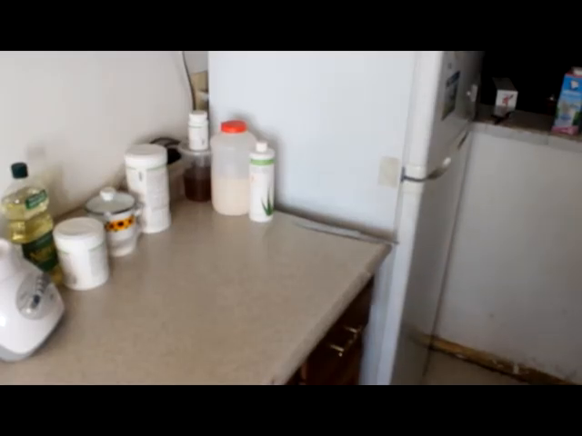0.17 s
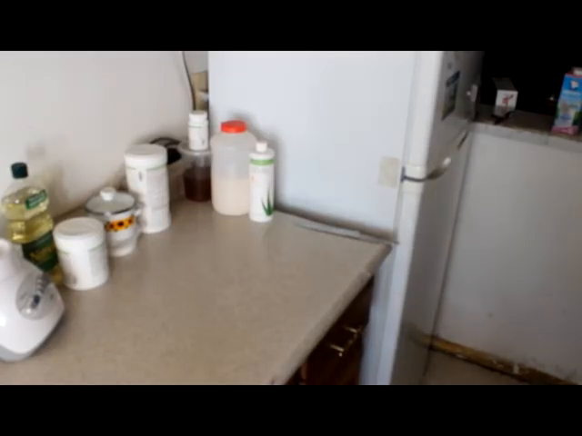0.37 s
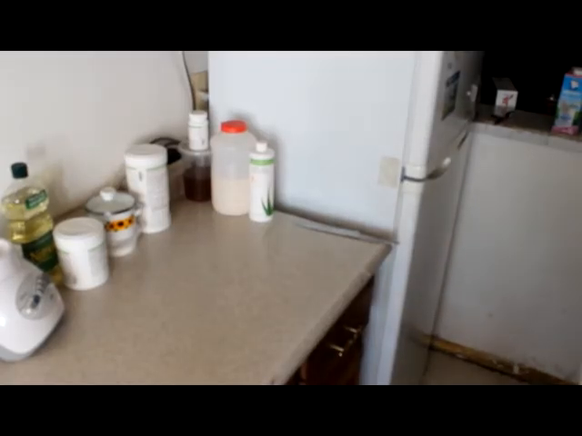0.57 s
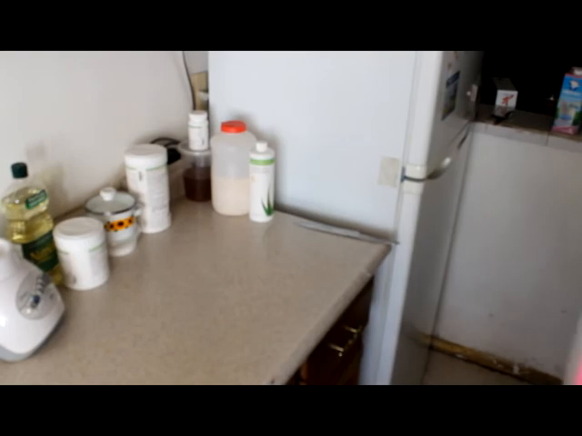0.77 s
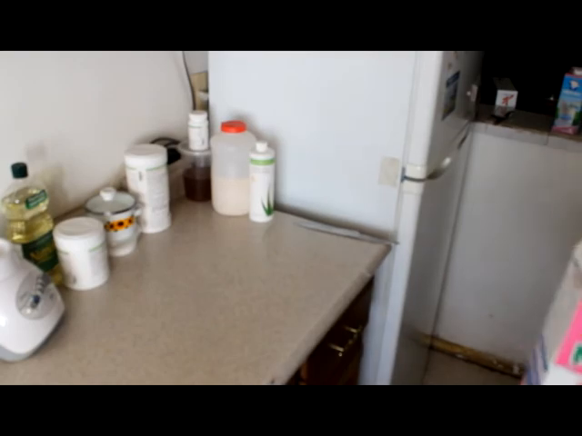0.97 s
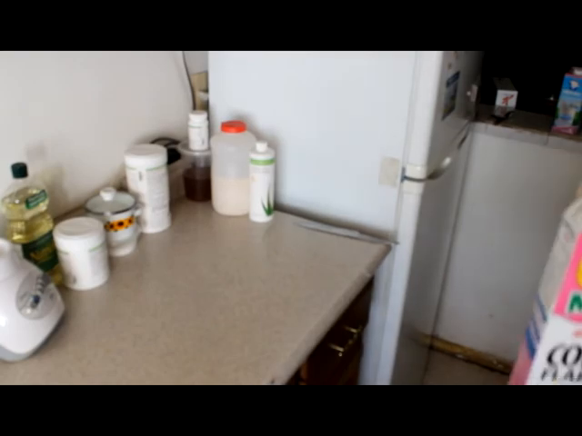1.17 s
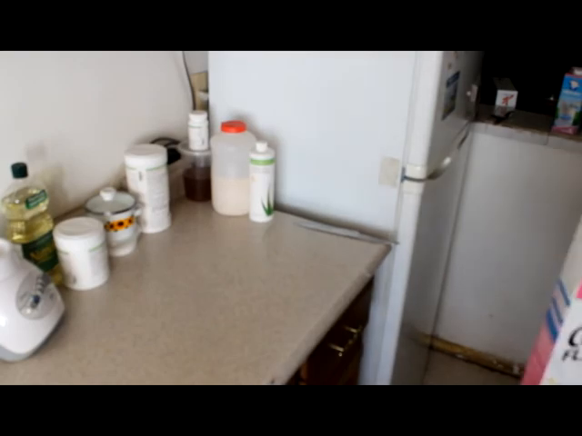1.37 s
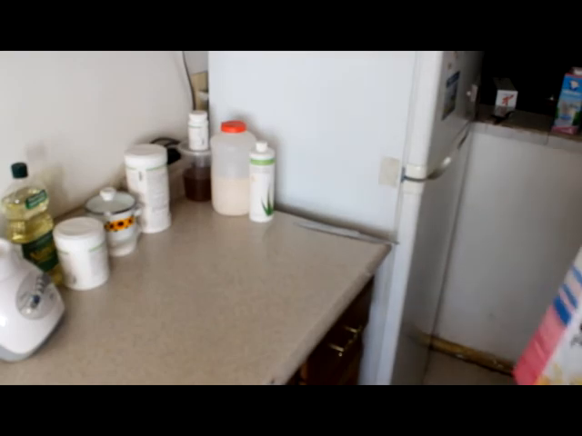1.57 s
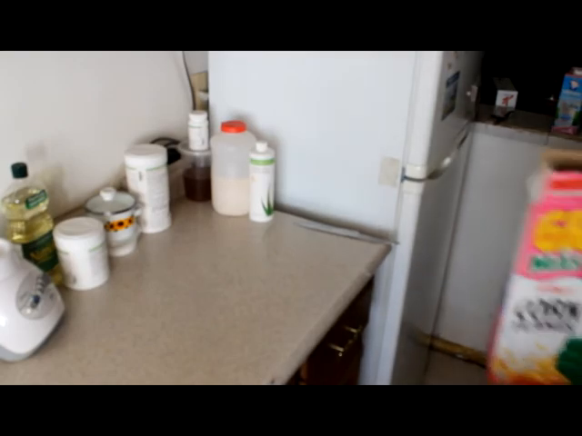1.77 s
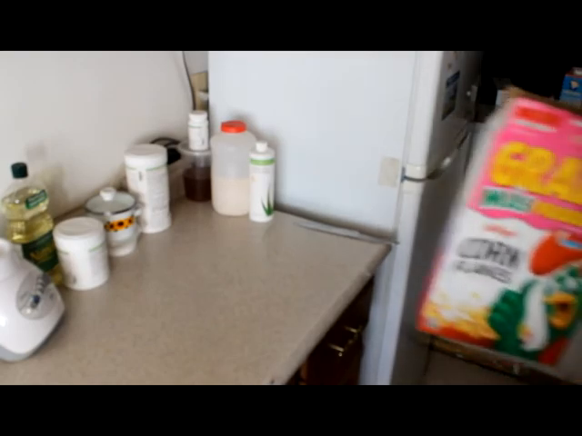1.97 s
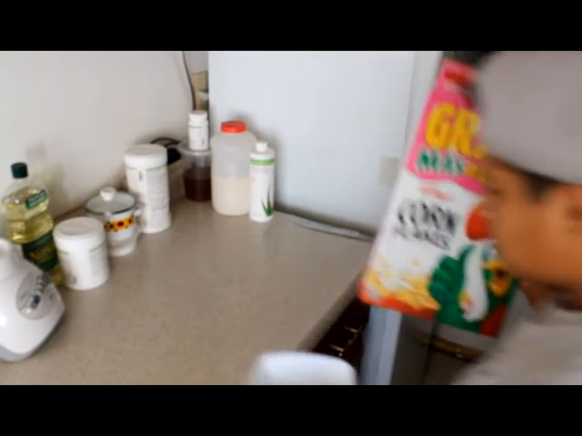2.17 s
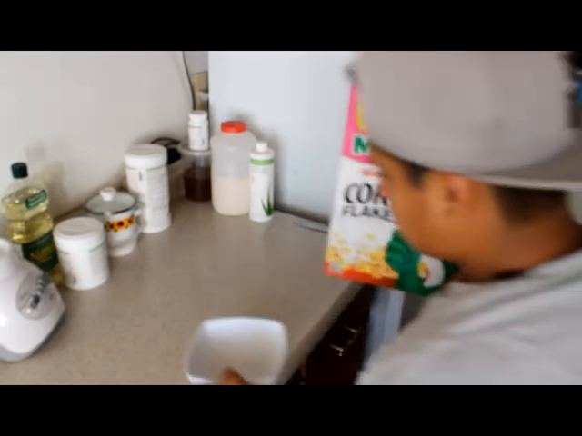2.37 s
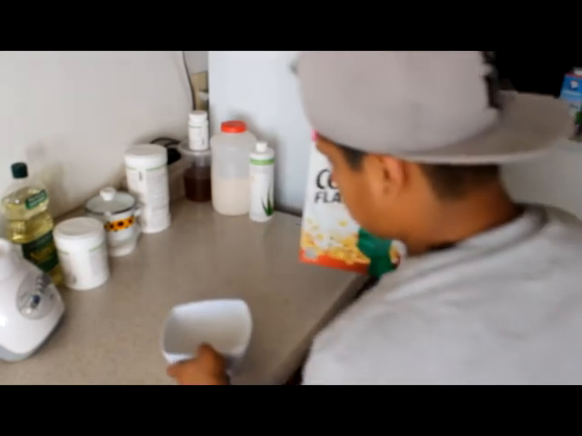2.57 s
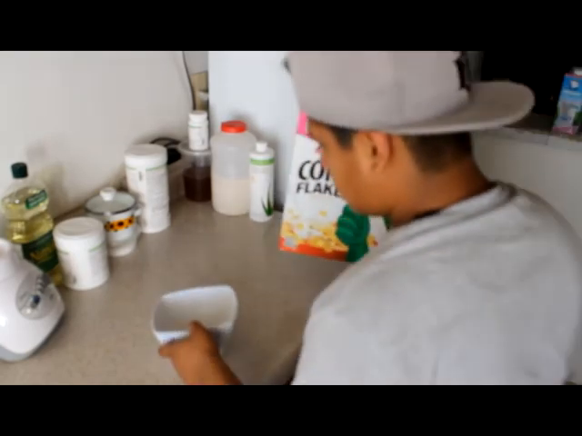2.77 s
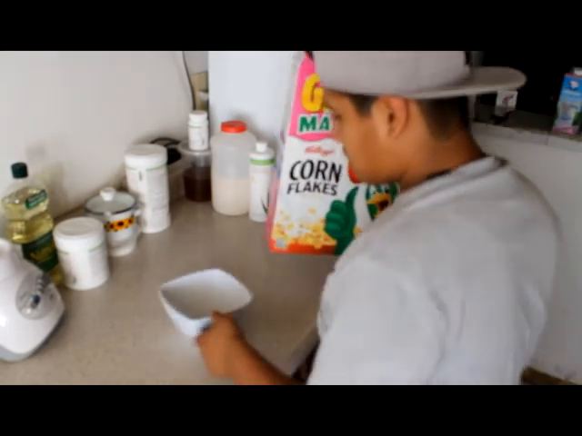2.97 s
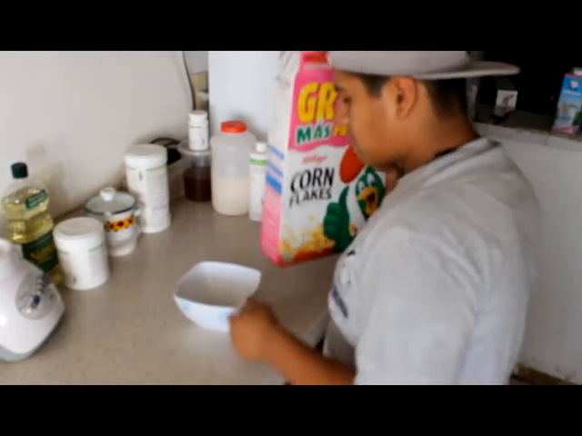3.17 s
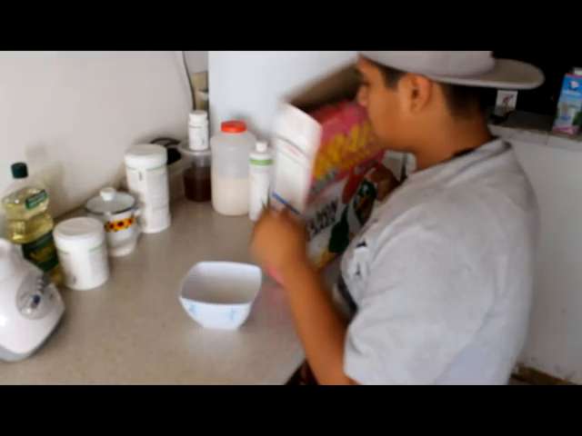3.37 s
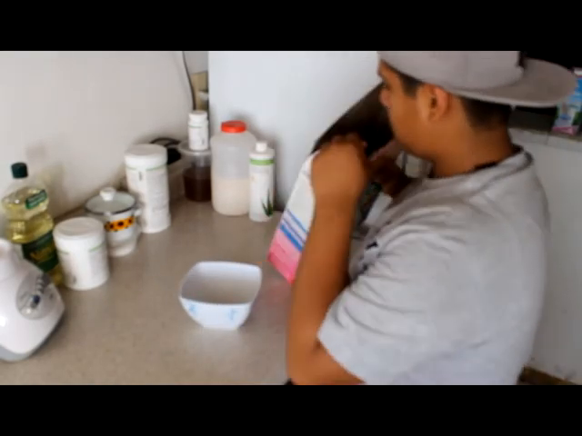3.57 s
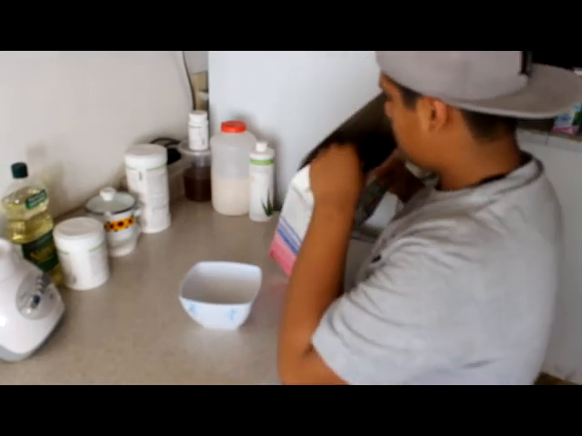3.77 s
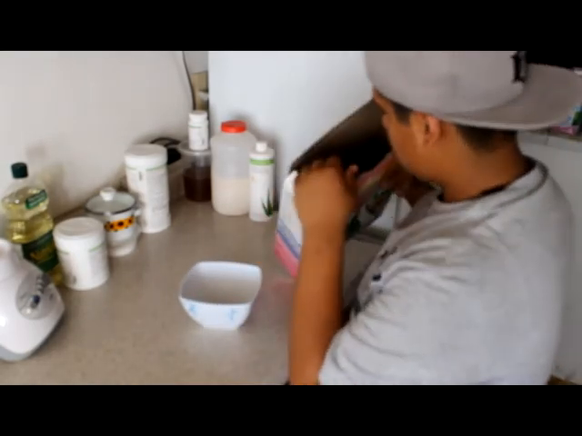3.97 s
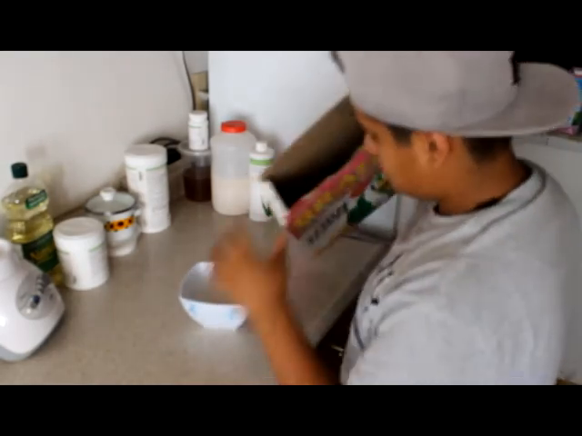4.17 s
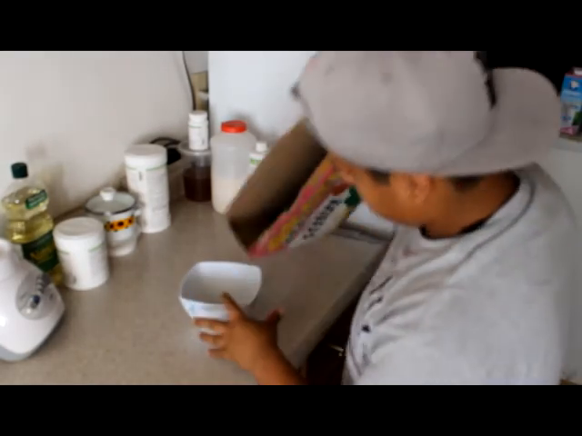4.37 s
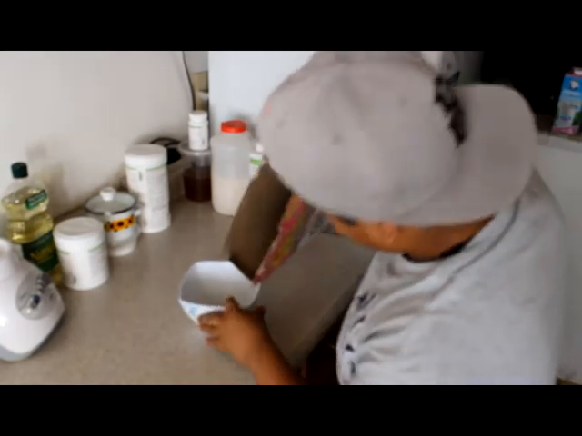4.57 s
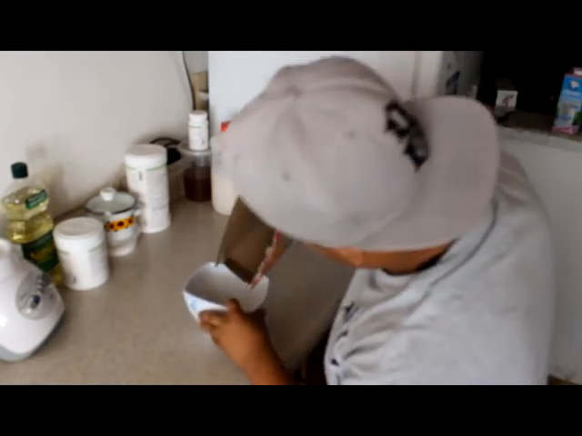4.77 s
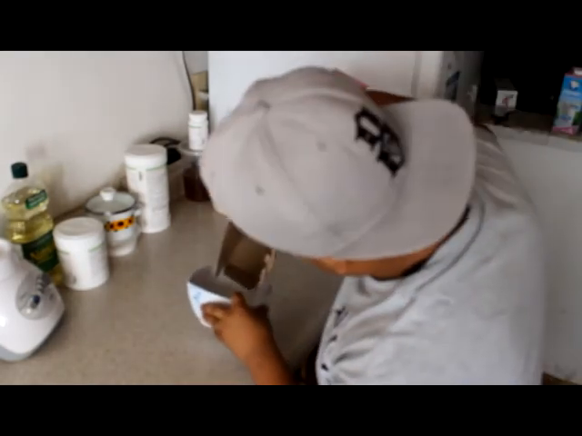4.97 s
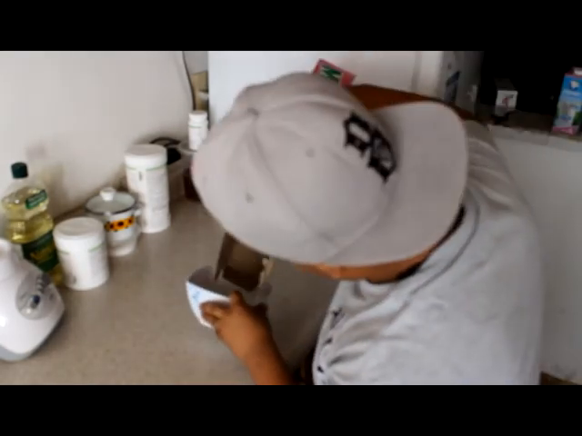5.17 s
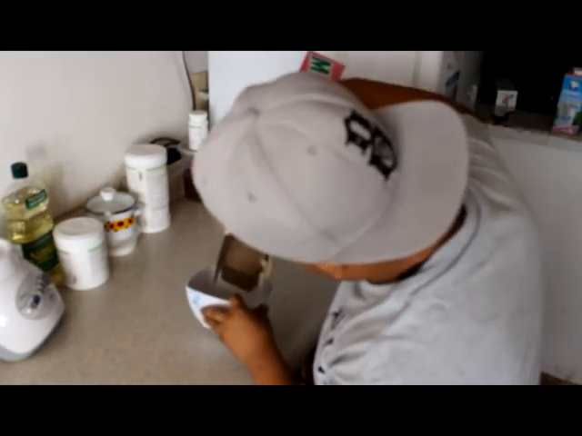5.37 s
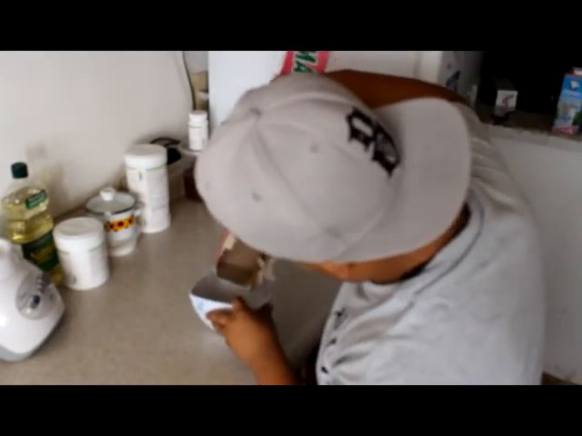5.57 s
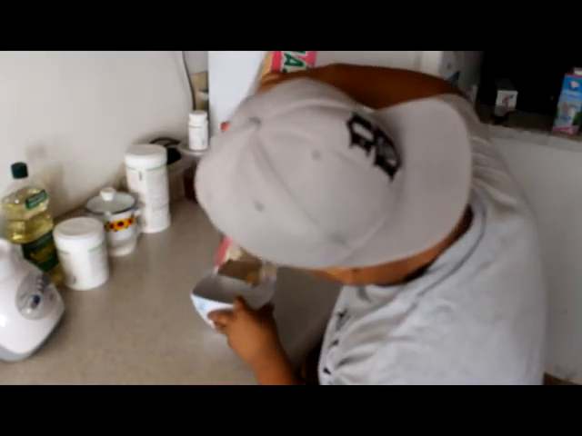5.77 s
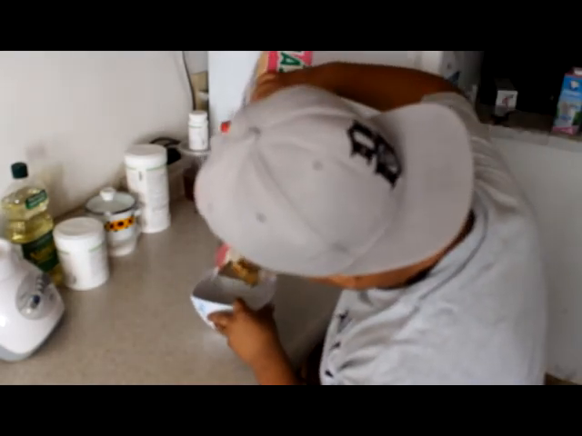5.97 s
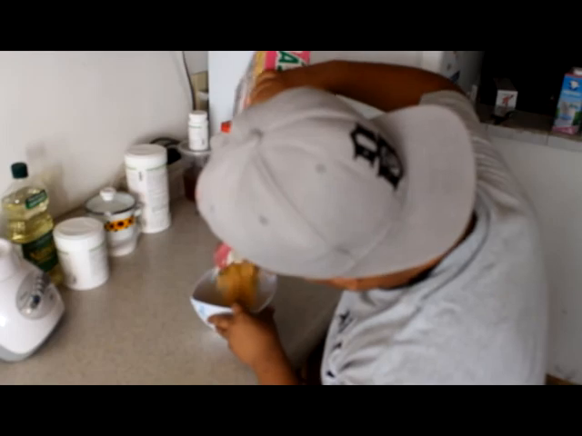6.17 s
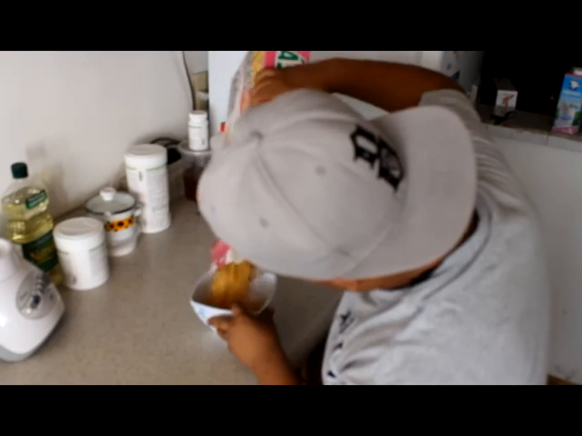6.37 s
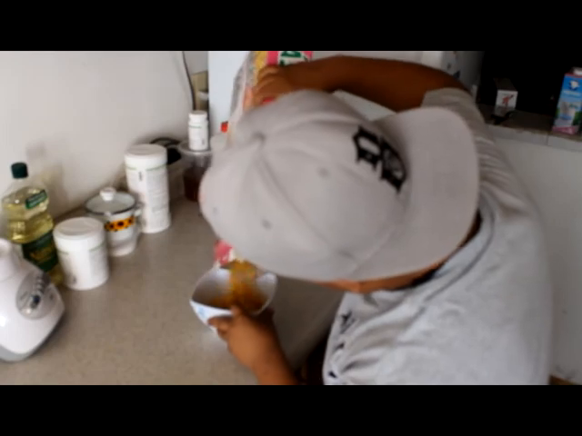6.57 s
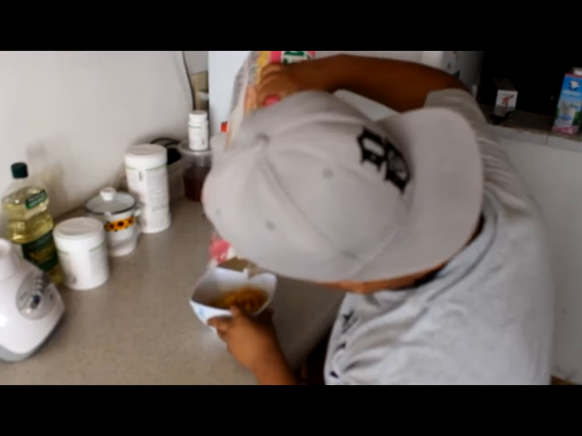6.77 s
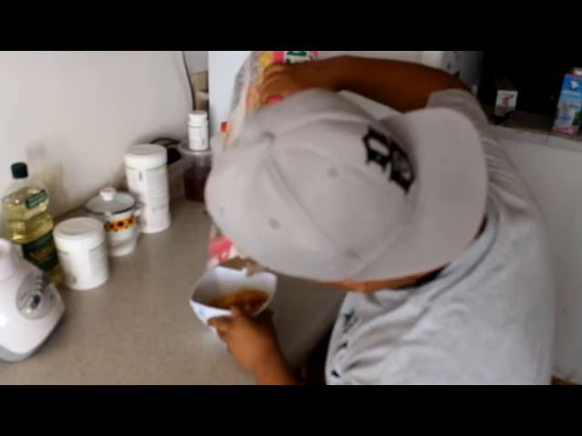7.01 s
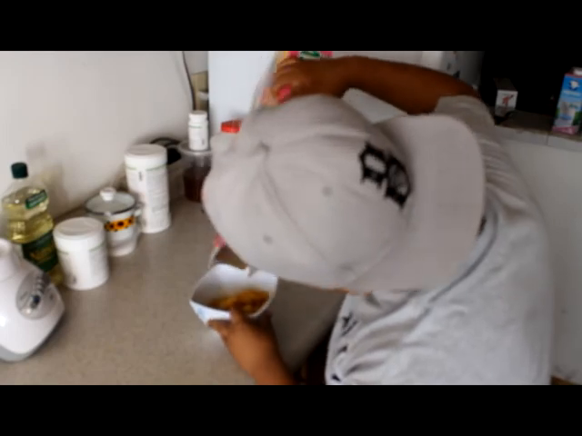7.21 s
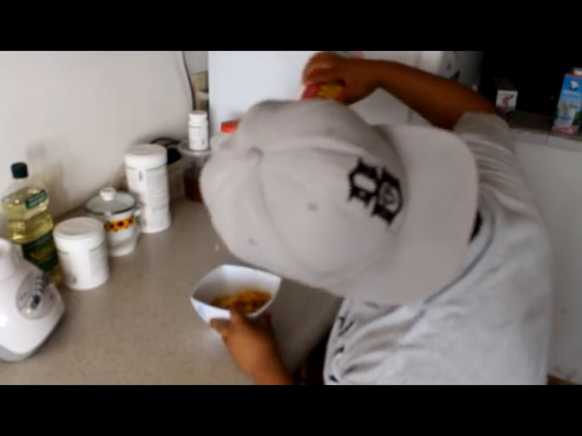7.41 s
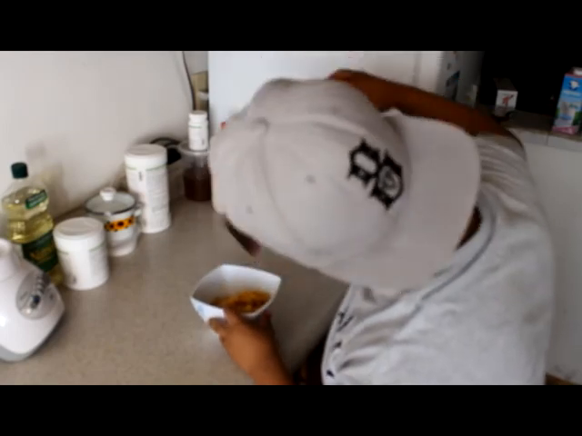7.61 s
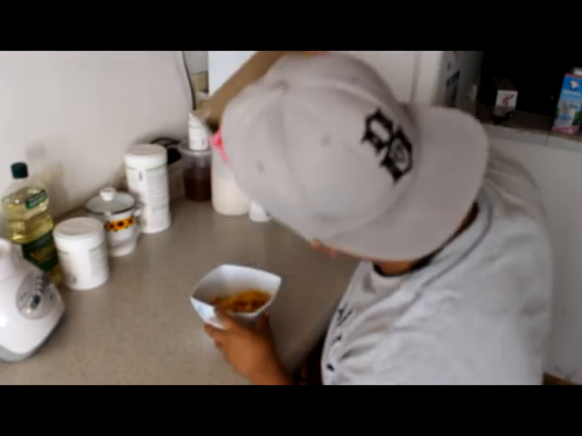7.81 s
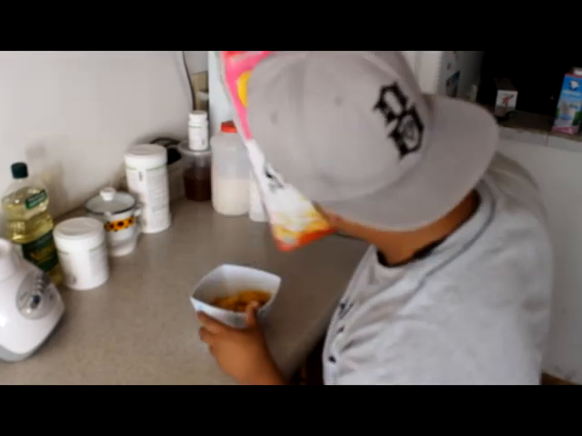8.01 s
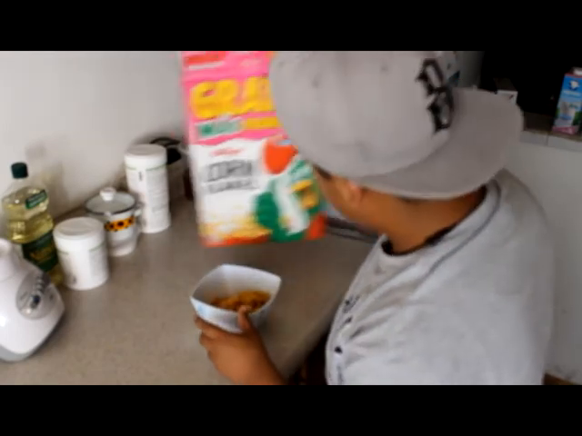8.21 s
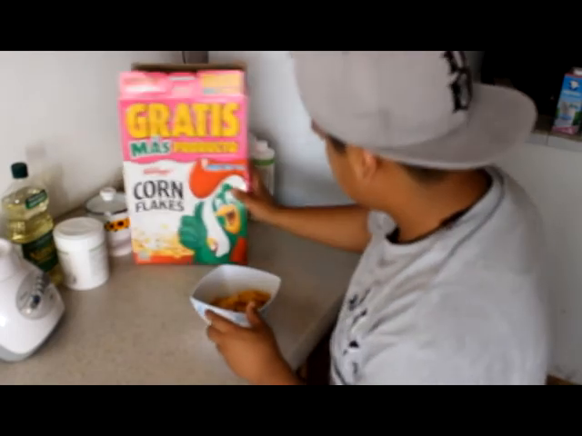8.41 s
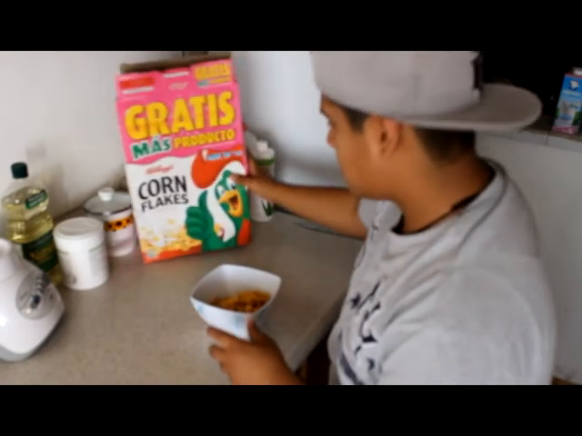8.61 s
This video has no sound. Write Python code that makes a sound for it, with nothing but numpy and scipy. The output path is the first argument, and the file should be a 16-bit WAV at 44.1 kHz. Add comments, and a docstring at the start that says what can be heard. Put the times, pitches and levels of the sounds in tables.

```python
"""Crisp flakes slide and shake in a cardboard box while a bowl is picked up, then set down bouncing.
The box tips, the heap runs to the spout and the flakes pour into the bowl; the box is knocked to the end.
Each flake is a tiny click that rings the carton or the ceramic; each knock is a judder ringing its object
and the counter. A small hard-walled room smears it all over a faint, wavering hum."""
import sys
import numpy as np
from scipy import signal
from scipy.fft import rfft, irfft, next_fast_len
from scipy.io import wavfile
from scipy.ndimage import uniform_filter1d

SR = 44100
rng = np.random.default_rng(int(sys.argv[2]) if len(sys.argv) > 2 else 0)


def persist_wave(psi):
    """Save psi, clipped to +-1, as 16-bit WAV."""
    counts = np.round(np.clip(psi, -1, 1) * 32767).astype(np.int16)
    wavfile.write(sys.argv[1], SR, np.atleast_2d(counts).T)


N = 381465


def undb(db):
    """Decibels to gain."""
    return 10 ** (np.asarray(db) / 20)


def unit(x):
    """Scale to rms 1."""
    return x / np.sqrt(np.mean(x ** 2))


def add(out, time_s, y):
    """Mix y into out from time_s."""
    i = int(time_s * SR)
    out[i:i + len(y)] += y[:N - i]


def sos_filter(x, sos):
    """Run a filter given as second-order sections."""
    return signal.sosfilt(sos, x)


def curve(rows):
    """Columns of (time [s], level [dB], ..) rows at every sample; -120 dB outside."""
    time_s, *columns = np.transpose(rows)
    return [np.interp(np.arange(N) / SR, time_s, c, -120, -120) for c in columns]


def colour(x, points):
    """Shape a spectrum by (frequency [Hz], gain [dB]) points, straight over log frequency."""
    hz, db = np.transpose(points)
    size = next_fast_len(len(x), True)
    f = np.maximum(np.fft.rfftfreq(size, 1 / SR), 1)
    gain = undb(np.interp(np.log(f), np.log(hz), db))
    return irfft(rfft(x, size) * gain, size)[:len(x)]


def resonate(x, peaks):
    """Sum of band-pass resonances with alternating sign, at rms 1."""
    total = 0
    for k, (hz, width_hz, db) in enumerate(peaks):
        band = signal.lfilter(*signal.iirpeak(hz, hz / width_hz, fs=SR), x)
        total = total + (-1) ** k * undb(db) / np.sqrt(width_hz) * band
    return unit(total)


def clicks(rate_hz, scatter_db):
    """Random flake impacts, most small, a few large, at most four scatter steps above the smallest."""
    hit = rng.random(N) < rate_hz / SR
    size_db = scatter_db * np.minimum(rng.exponential(size=N), 4)
    return unit(hit * rng.choice([-1, 1], N) * undb(size_db))


def walk(rate_hz):
    """Random levels joined by straight slews, spread about 0.65."""
    k = int(SR / rate_hz)
    steps = np.repeat(rng.standard_normal(N // k + 1), k)
    return 0.8 * uniform_filter1d(steps, k)[:N]


def surge(peak_s, db, swell_s, fade_s):
    """Gain, once a millisecond: straight dB slopes (s per 20 dB) up to a blunt peak and down."""
    round_s = .012  # bluntness of the peak
    t = np.arange(N * 1000 // SR + 2) / 1000 - peak_s
    distance_s = np.hypot(t, round_s) - round_s
    return undb(db - 20 * distance_s / np.where(t < 0, swell_s, fade_s))


def together(gains):
    """Unrelated rattles add in power; gain at every sample."""
    total = np.sqrt(sum(g ** 2 for g in gains))
    return np.interp(np.arange(N) / SR * 1000, np.arange(len(total)), total)


def ring(modes, stretch, t, near_hz=1000, fall_db=0):
    """One blow on modes, favouring one pitch; each gets a random sign, level share, slight detuning. Peak 1."""
    hz, db, t60_s = np.transpose(modes)[:, :, None]
    share, detune, sign = rng.standard_normal((len(modes), 3)).T[:, :, None]
    db = db + 1.5 * share - fall_db * np.abs(np.log2(hz / near_hz))  # fall in dB per octave
    swing = np.sign(sign) * np.sin(2 * np.pi * hz * (1 + 0.012 * detune) * t)
    y = (undb(db) * swing * 1000. ** (-t / (t60_s * stretch))).sum(axis=0)
    return y / np.abs(y).max()


# flakes sliding or jolted as the box is carried and turned: (time of peak [s], carton level [dB],
# swell [s per 20 dB], fade [s per 20 dB], crisp treble re carton [dB])
SLIDES = [(0.01, -46, .05, .3, -6), (0.08, -36, .02, .1, -18), (0.255, -18.5, .075, .2, -2),
          (0.4, -30, .2, .13, -4), (0.81, -43, .015, .1, -9), (0.88, -37, .02, .07, -14),
          (1.01, -46, .02, .04, -8), (1.09, -46, .1, .5, -3), (1.4, -46, .15, .2, -6),
          (1.48, -37, .03, .1, -11), (1.7, -35, .16, .3, -12), (1.86, -28, .13, .17, -4.5),
          (2.04, -30, .07, .1, -10), (2.15, -26, .05, .25, -5), (2.255, -20, .04, .15, -4.5),
          (2.3, -18, .08, .05, -11), (2.39, -20.5, .07, .3, -3), (2.51, -16, .2, .06, -12),
          (2.585, -17, .02, .11, -8), (2.7, -19.5, .05, .17, -11), (2.88, -36, .2, .05, -6),
          (3.22, -41, .05, .3, -18), (3.345, -39, .05, .1, -12), (3.4, -24, .04, .2, -9),
          (3.48, -22, .1, .12, -4), (3.6, -28, .1, .07, -22), (3.68, -35, .03, .1, -12),
          (3.87, -48, .08, .04, -25), (3.98, -52, .08, .04, -12), (4.075, -33, .03, .2, -7),
          (4.14, -33, .1, .12, -3), (4.24, -42, .1, .1, -20), (7.2, -56, .3, .3, -3),
          (7.29, -45, .015, .3, -12), (7.38, -43, .15, .06, -28), (7.6, -52, .05, .2, -3),
          (7.73, -56, .04, .1, 2), (7.93, -42, .07, .15, -25), (8.05, -45, .05, .3, -22),
          (8.22, -50, .05, .3, -18), (8.45, -36, .03, .09, -4), (8.6, -42, .15, .5, -20)]
# box tips, heap runs to the spout:
# (time [s], carton level [dB], crisp treble re carton [dB], side-panel ring re carton [dB])
TIPPING = [(4.3, -54, -10, -11), (4.37, -49, -5, -11), (4.42, -31, -2, -11), (4.56, -23, -6.5, 0),
           (4.62, -32, -11, 0), (4.67, -26, -2, -2), (4.72, -33, -1, 0), (4.8, -34, 3, -2),
           (4.89, -21, -5, -18), (5.0, -23, -1.5, -9), (5.1, -26, -2, -9), (5.24, -22, -6.5, -5),
           (5.47, -30, -7, 0), (5.6, -33, -7, -13), (5.91, -19.5, -3, -8), (6.13, -23, 4, -3),
           (6.3, -30, 6, -4), (6.59, -26.5, -1, -11), (6.72, -36, 0, -12), (6.87, -46, 0, -8),
           (7.05, -58, 2, -6)]
# carton resonances: (frequency [Hz], width [Hz], relative level [dB])
CARTON = [(259, 156, -7), (452, 68, 5), (616, 95, 1), (852, 182, 6.5), (1041, 81, -9.5), (1256, 67, 1.5),
          (1570, 230, -12.5), (2085, 40, -2)]
# side-panel resonance: (frequency [Hz], width [Hz], relative level [dB])
PANEL = [(1088, 137, 0)]
# spectrum of flake on flake: (frequency [Hz], relative level [dB])
CRISP = [(880, -34.5), (1500, -4), (1720, -4), (2090, -5), (2310, -5), (3990, -6), (14300, -24),
         (15500, -22)]


def box_flakes():
    """Flakes tumble in bursts: they drum on the carton and crackle against each other."""
    slide_panel_db = -12  # re carton
    tip_db, tip_crisp_db, tip_panel_db = curve(TIPPING)
    slides = [surge(*row[:4]) for row in SLIDES]
    sliding = together(slides)
    slide_crisp = together(undb(row[-1]) * g for row, g in zip(SLIDES, slides))
    carton = np.hypot(sliding, undb(tip_db))
    crisp = np.hypot(slide_crisp, undb(tip_db + tip_crisp_db))
    panel = np.hypot(undb(slide_panel_db) * sliding, undb(tip_db + tip_panel_db))

    hits = clicks(4000, 2.36)
    thump = unit(colour(hits, [(60, -51), (130, -37), (300, -24), (1200, 5), (3000, -9), (6000, -46)]))
    drum = unit(resonate(hits, CARTON) + .5 * thump)
    crackle = unit(colour(hits + clicks(5000, 1.6), CRISP))
    flicker = undb(1.4 * walk(20))
    return flicker * (carton * drum + crisp * crackle + panel * resonate(hits, PANEL))


# flakes landing in the bowl: (time [s], wall ring level [dB], heap crackle level [dB])
POUR = [(5.85, -41, -42), (6.13, -30, -32), (6.28, -25, -25), (6.34, -37, -26), (6.51, -33, -21.5),
        (6.66, -38, -24), (6.76, -36, -30), (6.92, -34, -32), (7.05, -54, -53), (7.24, -60, -66)]
# first flakes on the bare bottom, before it is covered:
# (time of peak [s], level [dB], swell [s per 20 dB], fade [s per 20 dB])
BARE = [(6.216, -13, .02, .15), (6.355, -20, .1, .04)]
# wall resonances: (frequency [Hz], width [Hz], relative level [dB])
BOWL_WALL = [(2950, 95, -5), (3900, 440, -5), (4220, 40, -16), (5060, 90, -12)]
# bottom resonances: (frequency [Hz], width [Hz], relative level [dB])
BOWL_BOTTOM = [(1685, 110, 10), (2100, 160, 8), (3510, 83, 2.5)]
# spectrum of flakes on the heap: (frequency [Hz], relative level [dB])
HEAP = [(1180, -55), (2000, -6), (2610, -16), (2890, -0.5), (3370, -3), (4000, 1.5), (5270, -1),
        (15500, -12.5)]


def bowl_flakes():
    """Falling flakes crackle on the heap, ring the walls, and the bottom until it is covered."""
    hits = clicks(1500, 3.5) * undb(3.5 * walk(25))
    wall_db, heap_db = curve(POUR)
    walls = undb(wall_db) * resonate(hits, BOWL_WALL)
    bottom = together(surge(*row) for row in BARE) * resonate(hits, BOWL_BOTTOM)
    heap = undb(heap_db) * unit(colour(hits + clicks(5500, 4.9), HEAP))
    return walls + bottom + heap


# single flakes on the rim: (time [s], peak level [dB])
CLINKS = [(6.1439, 1), (6.217, -11), (7.1104, -36)]
# rim modes: (frequency [Hz], relative level [dB], t60 [s])
RIM = [(3460, -5.5, .025), (3900, 0.5, .03), (5900, -1, 0.018), (6250, 0, 0.03), (8950, -4, .012),
       (11900, -6, 0.015)]


def rim_clinks():
    """A few single flakes strike the rim and ring its modes."""
    out = np.zeros(N)
    for time_s, db in CLINKS:
        add(out, time_s, undb(db) * ring(RIM, 1, np.arange(SR // 4) / SR))
    return out


# counter modes: (frequency [Hz], relative level [dB], t60 [s])
COUNTER_MODES = [(107.8, -10.5, 0.41), (138, 0.5, 0.11), (163, -1, 0.16), (201, -9, 0.14), (233.5, 4, 0.13),
                 (290, -4, 0.097)]


def knocks(table, modes, crack_s, judder_s, fall_db):
    """Each blow is a short judder that rings the object, plus a counter thud and a crack at the contact."""
    first_contact = 12  # first touch over the rms of the judder
    out, t = np.zeros(N), np.arange(SR // 3) / SR
    press = np.clip(t / .0015, 0, 1)
    for time_s, db, hz, thud_db, crack_db, stretch in table:
        crack = colour(rng.standard_normal(len(t)),
                       [(600, -14), (1500, 4), (2400, 2), (6000, -14), (15000, -28)])
        crack = unit(crack) / 3 * (np.exp(-t / crack_s) + 0.14 * np.exp(-t / 0.023))
        blow = rng.standard_normal(len(t)) * np.exp(-t / judder_s)
        blow[0] = first_contact
        body = signal.fftconvolve(blow, ring(modes, stretch, t, hz, fall_db))[:len(t)]
        body = body / np.abs(body).max()
        thud = undb(thud_db) * ring(COUNTER_MODES, 1, t)
        add(out, time_s, undb(db) * press * (body + thud + undb(crack_db) * crack))
    # small things push little air at low pitch
    return sos_filter(out, signal.butter(3, 90, "highpass", fs=SR, output="sos"))


# box set down, tapped or gripped: (time [s], body level [dB], favoured pitch [Hz],
# counter thud re body [dB], crack re body [dB], ring length factor)
BOX_KNOCKS = [(0.07, -26, 385, -5.5, -5, 0.78), (0.133, -35, 1570, -22, 14.5, 0.86),
              (1.289, -32.5, 614, -22, -13, 1.5), (1.449, -20, 826, -35, -6, 1.1),
              (1.482, -22.5, 584, -32, -21, 1.8), (2.019, -22.5, 616, -13.5, -13, 0.74),
              (2.58, -4, 396, -20, -18, 1.26), (2.672, -8, 1070, -14, -15, 0.79),
              (3.361, -9, 447, -6.5, 3, 1.4), (3.659, -20, 430, -22, -1, 0.56),
              (4.573, -3, 1050, -49, -19, 1.5), (4.586, -4, 970, -32, -25, 1),
              (4.669, 3, 1130, -39, -14.5, 0.84), (4.684, -2, 1030, -21, -20, 0.5),
              (4.89, -11.5, 410, -36, -15, 2.4), (5.5, -21, 398, -24, 5.5, 1.2),
              (6.904, -24.5, 468, -18.5, -2, 1.3), (7.278, -34, 412, -5, -12, 2),
              (7.418, -27, 450, -20, -20, 1), (7.433, -3, 1100, -24, -14, 0.9), (7.9, -33, 425, -7, -18, 2),
              (8.122, -21, 398, -11, -13, 2), (8.367, 4.5, 520, -6, -13, 0.3)]
# box modes: (frequency [Hz], relative level [dB], t60 [s])
BOX_MODES = [(234, -11, 0.13), (329.5, 1, 0.12), (413.6, 2.5, 0.092), (447, 1.5, 0.074), (493, 8.5, .04),
             (575, 1.5, 0.089), (688, 16, 0.013), (762, -1.5, 0.025), (873, 7, 0.053), (1053, 4.5, 0.031),
             (1150, -18, 0.022), (1320, 12.5, 0.012), (1391, 9.5, 0.014), (1680, 7, 0.0096),
             (1830, -10, .025), (1950, -1, 0.023), (2440, -13, .02), (3000, -5, 0.023)]


def box_knocks():
    """Carton blows: longer judder, ring focused near one pitch."""
    return knocks(BOX_KNOCKS, BOX_MODES, crack_s=0.01, judder_s=0.0037, fall_db=9)


# bowl picked up, then set down and bouncing: (time [s], body level [dB], favoured pitch [Hz],
# counter thud re body [dB], crack re body [dB], ring length factor)
BOWL_KNOCKS = [(0.801, -33, 1500, -21, -8, 0.98), (0.872, -24, 633, -10.5, -21, 0.62),
               (2.908, -9, 899, -18.5, -7, 0.5), (2.93, 3, 875, -48, -12.5, 0.68),
               (2.952, -16, 904, -29, -33, 0.9), (2.965, -6, 1100, -32, -33, 0.77),
               (2.99, 0, 1120, -44, -12, 0.99), (3.043, -11.5, 1200, -17, -16, 0.71),
               (3.069, -9, 896, -45, -16, 0.83)]
# bowl modes: (frequency [Hz], relative level [dB], t60 [s])
BOWL_MODES = [(384, -3.5, 0.066), (667, -1.5, 0.081), (877, 1, 0.065), (905, -15, 0.7), (1006, 0, 0.03),
              (1120, -10, 0.029), (1141, -2, 0.073), (1325, -3, 0.013), (1800, -6, 0.025),
              (2000, -5.5, 0.032), (3000, -9, 0.04), (3320, -19, .04), (3530, -10, .04), (4070, -20, 0.098),
              (5390, -13, 0.04), (5800, -19, 0.02)]


def bowl_knocks():
    """Ceramic blows: shorter judder, ring spread over more modes."""
    return knocks(BOWL_KNOCKS, BOWL_MODES, crack_s=0.0037, judder_s=0.0014, fall_db=3)


# bowl rocking on its foot: (time of peak [s], level [dB], swell [s per 20 dB], fade [s per 20 dB])
ROCK = [(2.93, -15, .03, .05), (2.994, -9, .008, .06), (3.09, -23, .3, .1)]


def rocking():
    """The foot chatters on the counter, too softly to wake the high modes; ring time sets each width."""
    peaks = [(hz, np.log(1000) / np.pi / t60_s, db)
             for hz, db, t60_s in BOWL_MODES if t60_s < .2 and hz < 2000]
    hits = clicks(500, 1.8)
    chatter = unit(colour(hits, [(300, 10), (1500, 8), (4000, -3), (10000, -47)]))
    return together(surge(*row) for row in ROCK) * (resonate(hits, peaks) + 0.28 * chatter)


# reverberation time: (frequency [Hz], t60 [s])
ROOM_T60 = [(150, 0.39), (500, 0.4), (1500, 0.37), (4000, 0.4), (10000, 0.42)]


def room(x):
    """Dense reflections from tiles and cupboards: octave bands of noise, each with its own decay."""
    t, tail = np.arange(int(.7 * SR)) / SR, 0
    hz, t60_s = np.transpose(ROOM_T60)
    for f in 62.5 * 2. ** np.arange(8):
        high_hz = f * 2 ** .5 * (1 + (f > 7e3) / 2)  # top band is wider
        bandpass = signal.butter(2, [f / 2 ** .5, high_hz], "bandpass", fs=SR, output="sos")
        band = sos_filter(rng.standard_normal(len(t)), bandpass)
        tail = tail + band * 1000. ** (-t / np.interp(np.log(f), np.log(hz), t60_s))
    tail = tail * np.clip(t / 0.0013, 0, 1)
    return signal.fftconvolve(x, tail / np.sqrt(np.sum(tail ** 2)))[:N]


# hum spectrum: (frequency [Hz], relative level [dB])
HUM = [(15, -31), (25, 1.5), (35, -7), (55, -10), (100, -14), (144, -10.5), (495, -11), (1200, -17),
       (2630, -28.5), (2920, -21), (5880, -28.5), (6380, -29.5), (15500, -34.5)]
HUM_DB = -50.5


def kitchen_hum():
    """Coloured noise whose level wavers slowly."""
    return undb(HUM_DB + walk(2.3)) * unit(colour(rng.standard_normal(N), HUM))


def scene():
    """Everything on the counter, its echo, and the hum of the kitchen."""
    knock_room_db, flake_room_db = -1, -8.5  # knocks echo louder in the room than flakes and rocking do
    hard = box_knocks() + bowl_knocks()
    soft = box_flakes() + bowl_flakes() + rim_clinks() + rocking()
    echo = room(undb(knock_room_db) * hard + undb(flake_room_db) * soft)
    return (hard + soft + echo + kitchen_hum())[None]


def record(dry):
    """The small microphone loses the deep bass of near sounds; loud knocks clip; the top is cut."""
    top_hz = 15700
    thin = sos_filter(dry, signal.butter(1, 45, "highpass", fs=SR, output="sos"))
    clipped = np.clip(thin, -1, 1)
    return sos_filter(clipped, signal.ellip(12, .2, 90, top_hz, fs=SR, output="sos"))


dry = scene()
out = record(dry)
persist_wave(out)
```